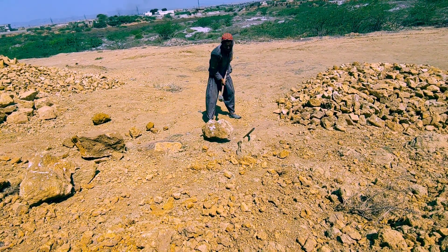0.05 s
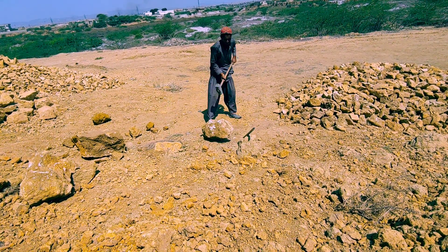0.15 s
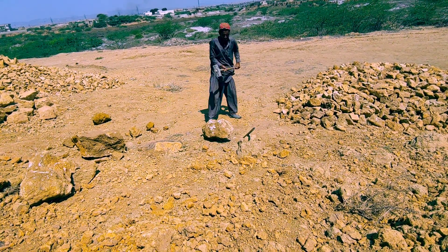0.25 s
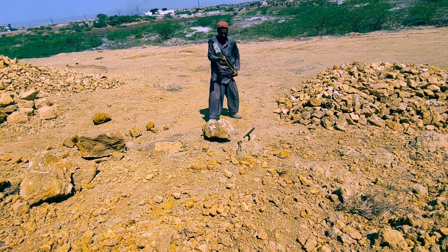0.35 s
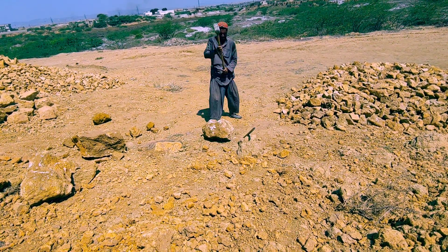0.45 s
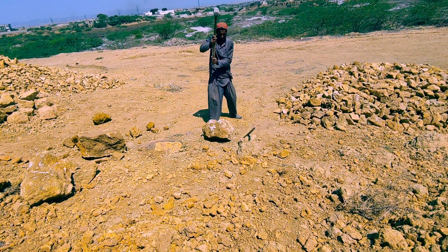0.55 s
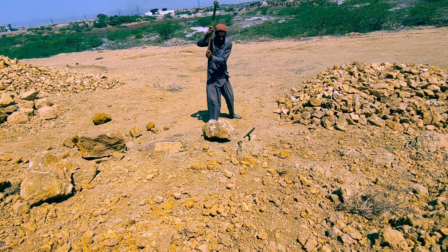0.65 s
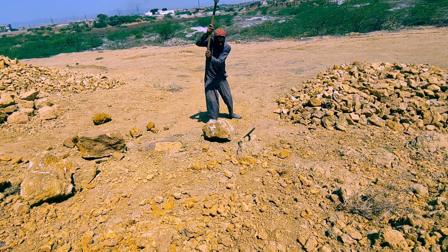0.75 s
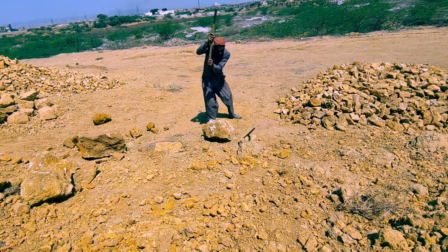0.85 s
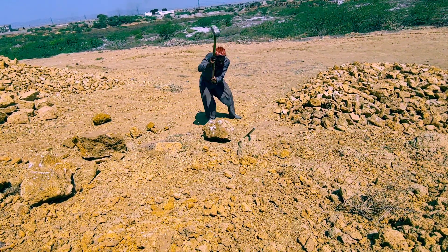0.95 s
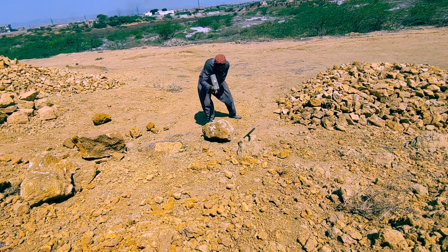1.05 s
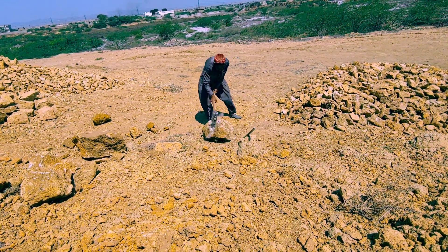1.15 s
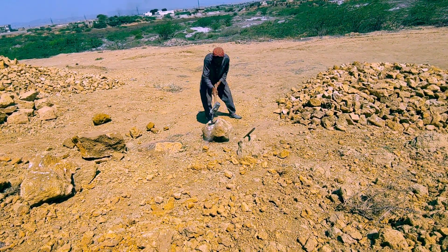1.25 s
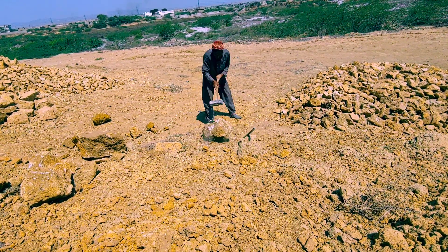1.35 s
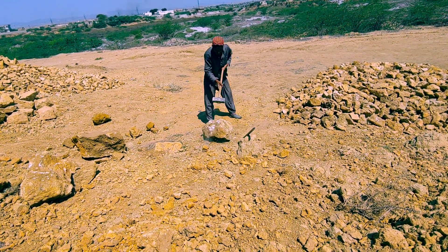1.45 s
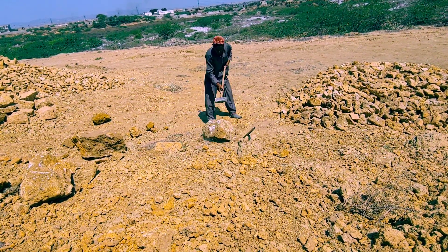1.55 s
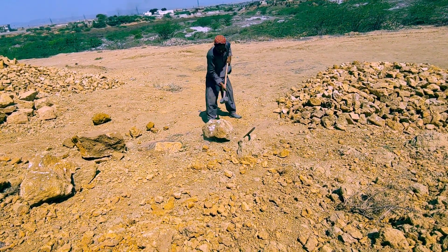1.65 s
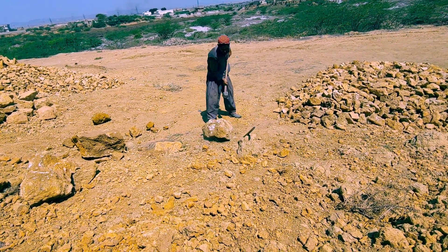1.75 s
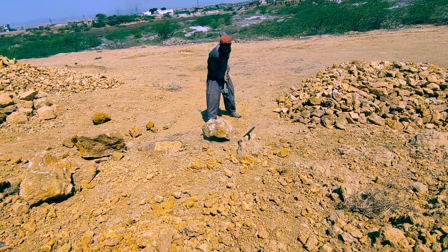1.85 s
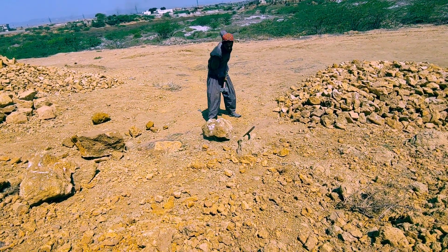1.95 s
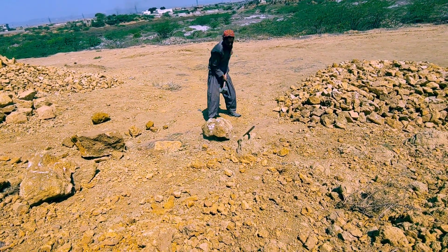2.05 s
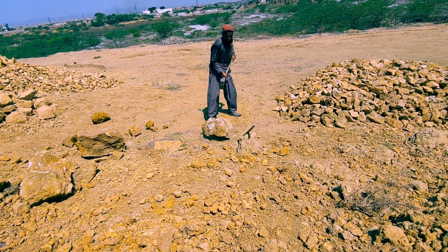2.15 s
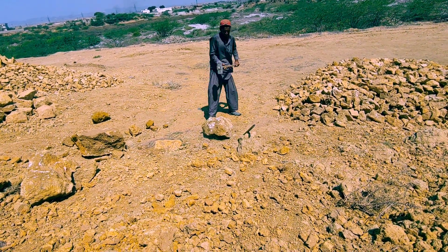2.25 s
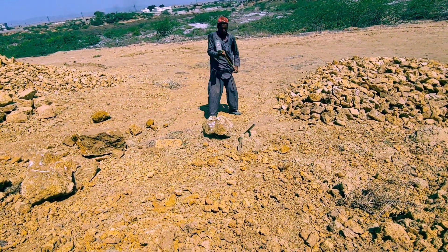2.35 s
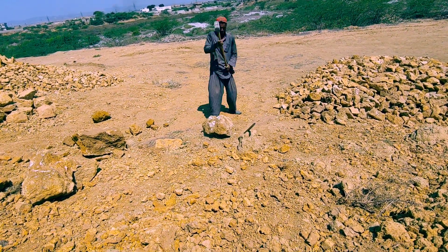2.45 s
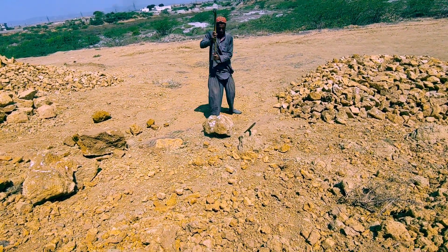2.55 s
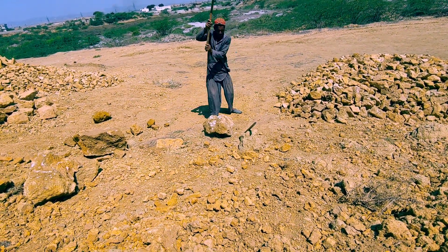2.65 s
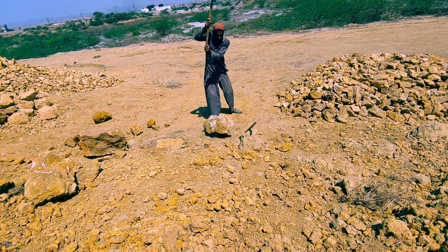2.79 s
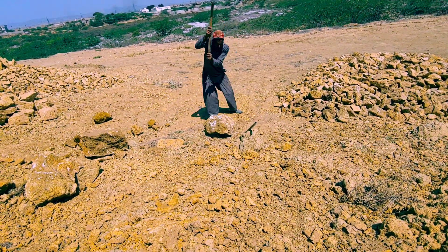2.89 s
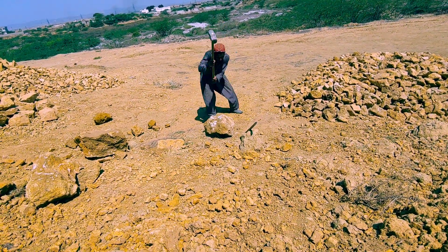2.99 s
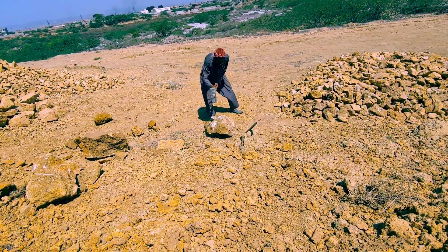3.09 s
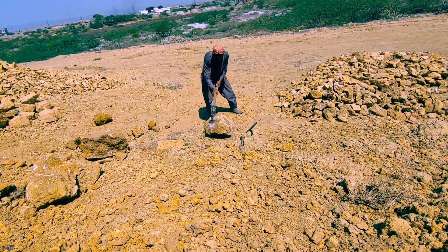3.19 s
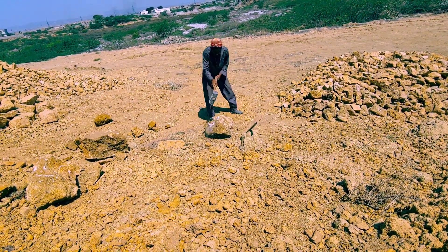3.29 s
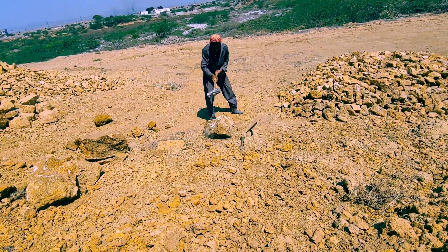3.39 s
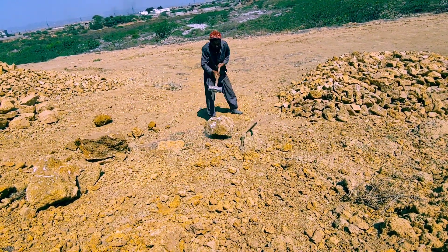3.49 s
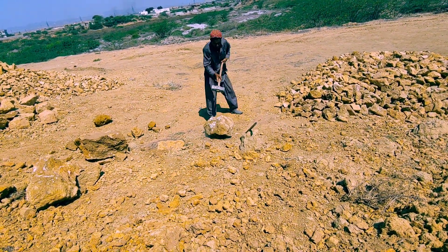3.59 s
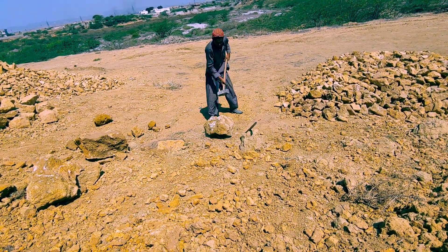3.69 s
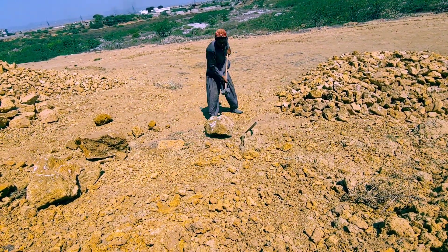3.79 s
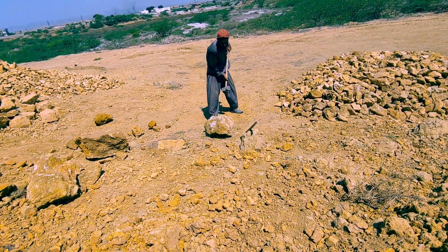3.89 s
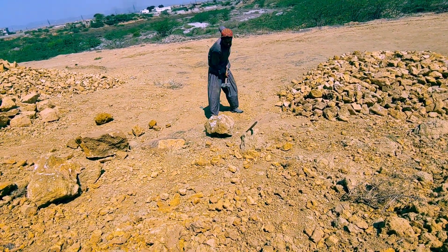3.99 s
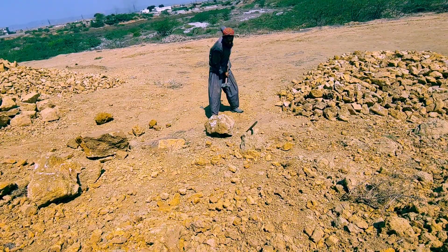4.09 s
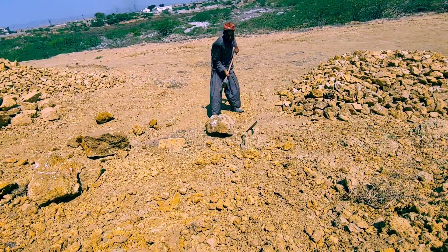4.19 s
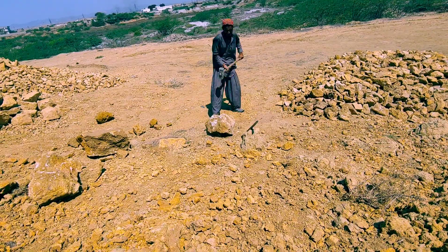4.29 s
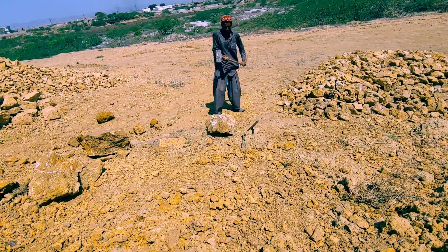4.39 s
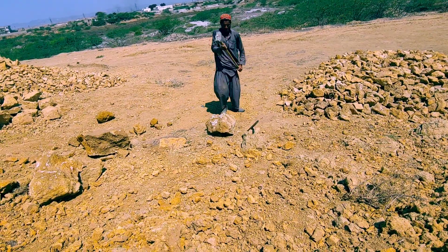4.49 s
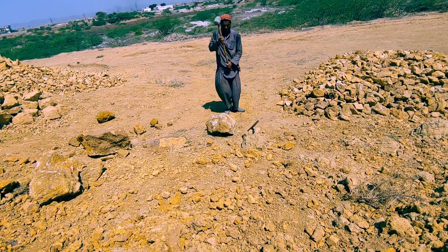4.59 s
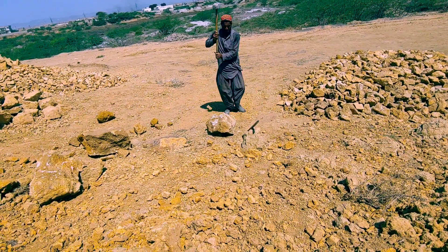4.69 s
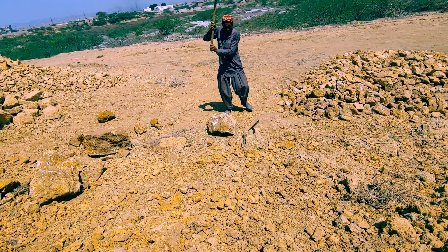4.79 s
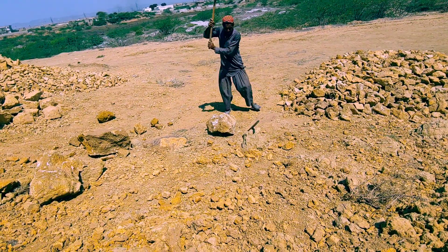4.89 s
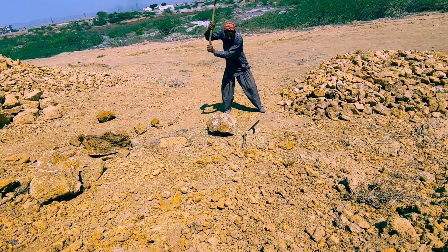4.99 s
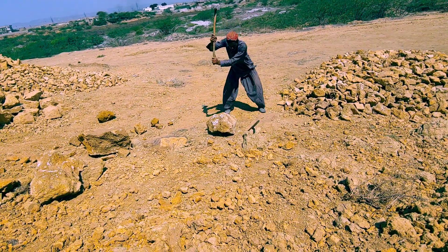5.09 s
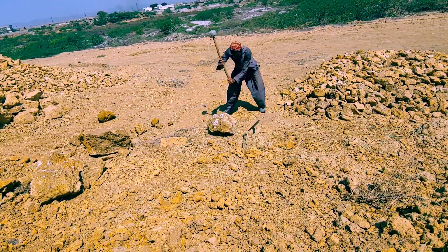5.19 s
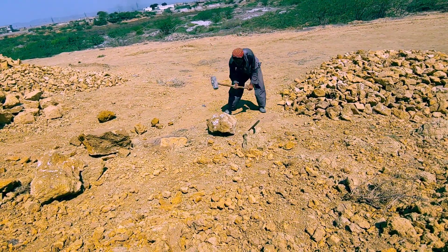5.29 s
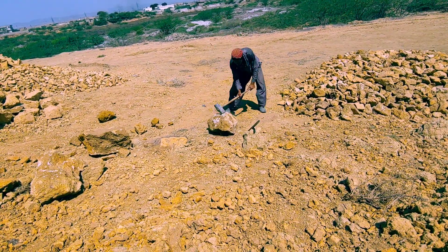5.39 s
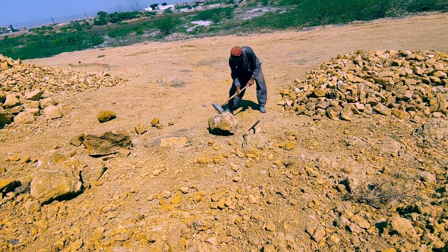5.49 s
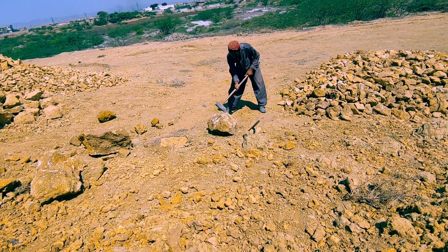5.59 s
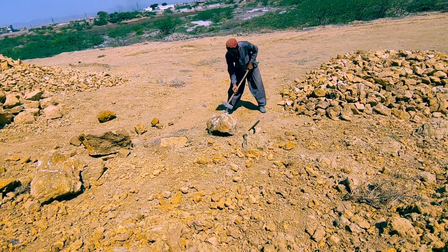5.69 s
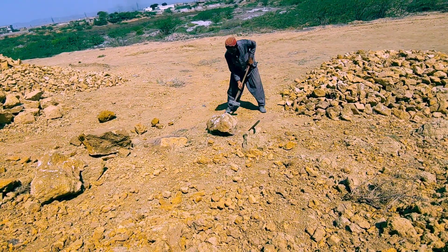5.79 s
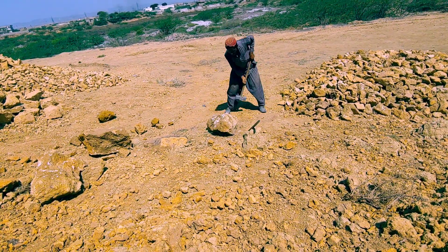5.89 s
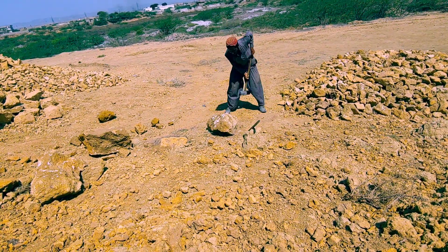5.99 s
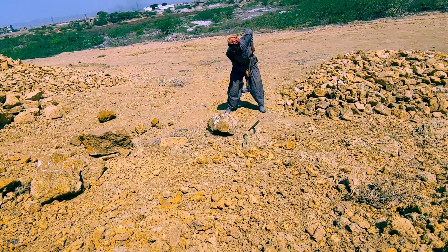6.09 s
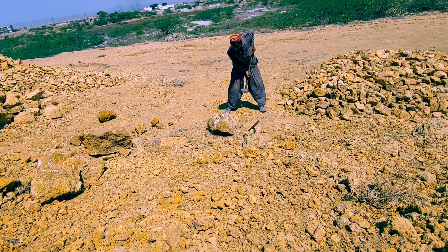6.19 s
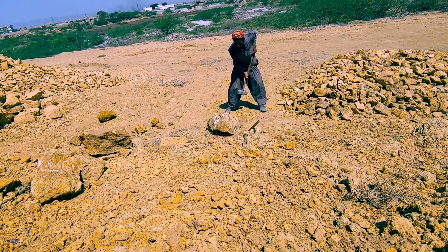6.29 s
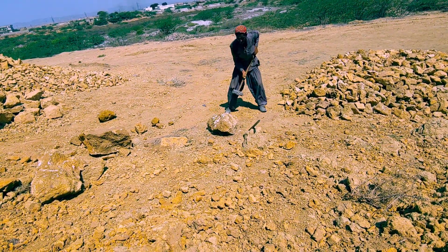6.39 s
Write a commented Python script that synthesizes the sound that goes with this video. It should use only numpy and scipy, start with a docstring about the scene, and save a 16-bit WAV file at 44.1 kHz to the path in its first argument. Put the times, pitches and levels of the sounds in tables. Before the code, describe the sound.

Heavy wind buffets the microphone, then fades, while three sharp, evenly spaced hammer blows strike rock outdoors and small stone fragments clink afterwards.

```python
"""On open, stony ground a sledgehammer strikes a boulder three times: damped tones ring the rock and steel,
phase-scrambled noise makes the cracks, decaying noise and delayed copies make the echoes from the rubble.
Grit scuffs and wooden handle knocks fall between the blows; air swishes and a few low thuds join them.
Wind buffets the microphone, mostly its left port, as bursts of low noise that die away.
Far off, a faint wavering tone sounds once, with a second tone over it, and birds whistle thinly."""
import sys
import numpy as np
from scipy import signal
from scipy.fft import rfft, irfft, next_fast_len
from scipy.io import wavfile
from scipy.ndimage import map_coordinates

SR = 44100
rng = np.random.default_rng(int(sys.argv[2]) if len(sys.argv) > 2 else 0)


def to_wav(sig):
    """Store sig (one row per channel, or 1-D mono) as 16-bit WAV at the path in sys.argv[1].

    Samples outside -1..1 are clipped; the rate is SR.
    """
    pcm = np.clip(np.atleast_2d(sig), -1, 1) * 32767
    pcm = np.round(pcm).astype(np.int16)
    wavfile.write(sys.argv[1], SR, pcm.T)  # frames by channels


N = 284445

# modes of the struck boulder, before each blow shifts them: [f/Hz, relative level/dB, time to fall 60 dB/s]
ROCK_MODES = [(219, -10, 0.035), (356, -16.5, 0.026), (553, -15.5, 0.058), (667, -12.5, 0.03),
              (857, -4, 0.015), (1230, -5, 0.024), (1430, -8.5, 0.033), (1760, -20, 0.022),
              (1924, -11.5, .016), (2370, -22, 0.0086), (2834, -15.5, 0.012), (3250, -24.5, 0.012),
              (3600, -25, 0.012), (4500, -33.5, 0.015)]
CRACK_DB = 6.5  # added to the level of every crack


def amp(db):
    """Turn decibels into a plain multiplier."""
    return 10 ** (np.asarray(db) / 20)


def unit(x):
    """Scale a sound to an rms of 1."""
    return x / np.sqrt(np.mean(x ** 2) + 1e-20)


def curves(rows):
    """One value per sample for each column after the time."""
    s, *cols = np.transpose(rows)
    return [np.interp(np.arange(N) / SR, s, c) for c in cols]


def wobble(rate, size=N):
    """A smooth random curve, rate knots a second."""
    knots = rng.standard_normal(int(size * rate / SR) + 4)
    return map_coordinates(knots, [np.arange(size) * rate / SR])


def filtered(x, response):
    """Shape the spectrum of x by a response that depends on frequency."""
    n = x.shape[-1]
    padded = next_fast_len(n + SR // 8)
    spectrum = rfft(x, padded) * response(np.fft.rfftfreq(padded, 1 / SR))
    return irfft(spectrum, padded)[..., :n]


def noise(spectrum, size):
    """Noise of rms 1 with a [f/Hz, level/dB] spectrum."""
    f, db = np.transpose(spectrum)
    white = rng.standard_normal(size)
    return unit(filtered(white, lambda hz: amp(np.interp(np.log(hz + 1), np.log(f), db))))


def wide(spectrum, size, side_db):
    """Stereo noise: a shared part and a difference between the ports."""
    mid = noise(spectrum, size)
    side = amp(side_db) * noise(spectrum, size)
    return unit(np.array([mid + side, mid - side]))


def burst(t, length, edge):
    """A soft-edged window that lasts for length."""
    rise = np.sin(np.pi / 2 * np.clip(t / edge, 0, 1)) ** 2
    return rise / (1 + (t / length) ** 14)


def add(track, s, sound):
    """Mix a sound into a track at time s."""
    part = track[..., max(0, round(s * SR)):][..., :sound.shape[-1]]
    part += sound[..., :part.shape[-1]]


def ring(modes, t):
    """Damped modes, one row each; neighbours swing in opposite directions."""
    rows = []
    for k, (hz, db, t60) in enumerate(modes):
        rows.append((-1) ** k * amp(db - 60 * t / t60) * np.sin(2 * np.pi * hz * t))
    return np.array(rows)


def air(rush_db, hiss_db):
    """Moving air: a broad rush of noise with a slightly grainy hiss above it."""
    # spectra of the rush and of the hiss: [f/Hz, relative level/dB]
    rush_spectrum = [(60, -8), (200, 8), (500, 3.5), (800, 4.5), (1050, -4.5), (1350, 1), (1650, -8.5),
                     (2000, -8.5), (3000, -23.5), (6000, -45.5)]
    hiss_spectrum = [(1000, -17.5), (2600, 3), (4500, -1.5), (6500, -9), (8500, -15.5), (11500, -12),
                     (13500, -23)]
    gusts_db = .6 * wobble(10)
    rush = amp(rush_db - 2.0 + gusts_db) * wide(rush_spectrum, N, side_db=-4.0)
    grainy_db = hiss_db + gusts_db + 0.38 * wobble(230)
    return rush + amp(grainy_db) * wide(hiss_spectrum, N, side_db=0.0)


def breeze():
    """Air rushes over the open ground; the hiss follows its level."""
    # strength of the breeze, before the gusts and trim in air(): [t/s, level/dB]
    strength = [(0, -54), (.5, -55), (1.08, -53), (1.32, -59.5), (1.6, -55.5), (2.77, -54.5), (2.82, -65),
                (6.45, -64)]
    strength_db, = curves(strength)
    return air(strength_db, strength_db - 18.5)


def soughs():
    """The first gusts carry a thin, high band of rushing air."""
    # swells: [t/s, length/s, level/dB]
    swells = [(.1, .23, -58.5), (.92, .19, -65)]
    # colour of the air: [f/Hz, relative level/dB]
    sough_spectrum = [(900, -25.5), (1400, 9), (2000, 3), (2300, -14), (4000, -37.5)]
    out, t = np.zeros((2, N)), np.arange(SR // 2) / SR
    for s, length, db in swells:
        add(out, s, amp(db) * burst(t, length, edge=.06) * wide(sough_spectrum, len(t), side_db=-4))
    return out


def winds():
    """Strength of the wind at each port, in dB."""
    # wind at the left and at the right port: [t/s, strength/dB]
    left_wind = [(0, -1), (.16, -18.5), (.22, -22.5), (.4, -9), (.53, -20), (.64, -19), (.79, -27),
                 (.9, -31), (1.05, -21.5), (1.12, -32), (1.2, -30.5), (1.3, -20.5), (1.35, -38),
                 (1.5, -15.5), (1.6, -34), (2.25, -32.5), (2.4, -42.5), (2.55, -45), (2.8, -48),
                 (3.03, -57.5), (3.42, -52.5), (3.56, -38), (3.7, -50.5), (3.85, -31.5), (4.03, -39),
                 (4.12, -53), (4.7, -54), (6.45, -59)]
    right_wind = [(0, -9), (.2, -29), (.29, -23.5), (.33, -22), (.43, -32.5), (.66, -25.5), (.82, -26.5),
                  (.95, -42.5), (1.38, -45), (1.62, -28.5), (1.92, -33), (2.25, -28), (2.42, -44.5),
                  (2.77, -38.5), (2.92, -54), (3.68, -57.5), (3.78, -41), (3.92, -34), (4.02, -56),
                  (6.45, -56)]
    return curves(left_wind) + curves(right_wind)


def eddy(length, db):
    """A swirl of air: a low push that levels off, and a flutter that is brighter when stronger."""
    # spectra of the push and of the flutter: [f/Hz, relative level/dB]
    push_spectrum = [(15, -18.5), (45, -3.5), (90, 8.5), (200, 2), (290, -6), (420, -24.5), (900, -92)]
    flutter_spectrum = [(120, -34), (300, 8), (450, 6.5), (700, -9.5), (1200, -28.5), (2000, -43.5),
                        (3500, -63.5), (6000, -105)]
    t = np.arange(SR // 10) / SR
    push = noise(push_spectrum, len(t)) * burst(t, length, edge=.003)
    age = t / (.4 * length)  # 1 when the flutter's average swell is strongest
    flutter = noise(flutter_spectrum, len(t)) * (age * np.exp(-age)) ** 3
    flutter = flutter * amp(4.5 * wobble(120, size=len(t)))
    flutter_db = -21.5 + 1.09 * db  # grows a little faster than the strength
    reach_hz = 2180 * amp(flutter_db / 4)
    flutter = filtered(flutter, lambda hz: 1 / np.hypot(1, (hz / reach_hz) ** 2))
    overload_db = -9  # the push gain levels off here
    push_gain = amp(db) / (1 + amp(db - overload_db) ** 4) ** (1 / 4)
    return (push_gain * unit(push) + amp(flutter_db) * unit(flutter)) * np.sqrt(length / t[-1])


def buffeting():
    """Turbulence rumbles in each port separately; hard eddies thump through it."""
    # colour of the rumble: [f/Hz, relative level/dB]
    rumble_spectrum = [(15, -17.5), (40, 7.5), (85, 4.5), (140, -1.5), (220, -13.5), (320, -27.5),
                       (600, -43.5), (1500, -60.5), (3000, -100)]
    # the hardest eddies: [t/s, length/s, strength/dB, port (0 left, 1 right)]
    hard_eddies = [(.004, 0.034, 7, 0), (0.043, 0.06, -25, 1), (0.047, 0.024, -4, 0),
                   (0.071, 0.021, 7.5, 0), (0.096, 0.019, 7, 0), (0.128, 0.048, 4, 0), (0.202, 0.012, 0, 0),
                   (0.272, 0.037, 2, 0), (0.318, 0.016, -7.5, 0), (0.369, 0.022, -3.5, 0),
                   (0.443, 0.058, -9, 0), (0.536, 0.13, -24, 1), (0.557, 0.035, -8.5, 0),
                   (0.583, 0.033, 1.5, 0), (0.609, 0.039, 4, 0), (0.613, 0.017, -18.5, 1),
                   (0.67, 0.042, -20.5, 0), (0.738, 0.016, -11.5, 0), (0.828, 0.016, -18.5, 0),
                   (0.942, 0.022, -18.5, 0), (0.991, 0.021, -21.5, 0), (1.02, 0.019, -10.5, 0),
                   (1.388, 0.015, -17.5, 0), (1.438, 0.0067, -10.5, 0), (1.524, 0.034, -11, 0),
                   (1.858, 0.012, -31, 0), (2.17, 0.016, -27, 0), (2.259, .03, -20.5, 1),
                   (2.322, .02, -47, 1), (2.921, 0.014, -49, 0), (3.48, 0.026, -44.5, 0),
                   (3.598, 0.025, -31, 0), (3.811, 0.022, -30.5, 0), (3.894, 0.025, -38.5, 1)]
    out = np.array([amp(db) * unit(noise(rumble_spectrum, N) * amp(5.1 * wobble(14))) for db in winds()])
    for s, length, db, port in hard_eddies:
        add(out[int(port > .5)], s, eddy(length, db))
    return out


def small_eddies():
    """Lesser eddies reach each port at random, their strength following the wind there."""
    out = np.zeros((2, N))
    rate, length = 5.7, 0.023  # eddies per second; seconds
    below_wind_db, spread_db = -6, 3
    for port, wind_db in zip(out, winds()):
        for slot in range(int(rate * N / SR)):
            s = (slot + rng.random()) / rate
            db = wind_db[int(s * SR)] + below_wind_db + spread_db * rng.standard_normal()
            add(port, s, eddy(length, db))
    return out


def crackles():
    """A breaking eddy snaps the pressure at the left port down and up once."""
    # snaps, before the port softens them: [t/s, peak level/dB, f/Hz]
    snaps = [(.003, -9, 480), (.022, -10, 430), (.029, -7, 400), (.081, -9, 540), (.086, -13, 620),
             (.103, -13, 430), (.108, -9, 480), (.131, -14, 400), (.139, -10, 400), (.152, -17, 520),
             (.162, -6, 500), (.208, -16, 420), (.215, -15, 420), (.281, -16, 420), (.291, -16, 430),
             (.3415, -4, 600), (.384, -15, 350), (.461, -19, 380), (.563, -23, 400), (.59, -11, 660),
             (.621, -12, 470), (.635, -13, 580), (.746, -23, 370), (.843, -25, 400), (.953, -28, 360),
             (1.034, -25, 320), (1.441, -22, 350), (1.534, -21, 320)]
    out, t = np.zeros((2, N)), np.arange(SR // 100) / SR - 1 / 200
    for s, db, hz in snaps:
        u = 2 * np.pi * hz * t
        add(out[0], s + t[0], amp(db) * u * np.exp((1 - u ** 2) / 2))
    return out


def ports(pressure):
    """Wind pressure saturates in the ports, which pass little of its treble."""
    held = pressure / (1 + np.abs(pressure / .95) ** 4) ** (1 / 4)
    return filtered(held, lambda hz: 1 / np.hypot(1, (hz / 1850) ** 4))


def far_tone():
    """Two faint tones from across the field, wavering in pitch and level; the second rises."""
    # the first tone, then the second, before wavering: [t/s, f/Hz, level/dB]
    first_tone = [(3.32, 513, -94), (3.37, 515, -67), (3.41, 508, -66), (3.46, 490.5, -78.5),
                  (3.52, 503, -62.5), (3.57, 509, -63), (3.61, 508, -66), (3.635, 510, -53),
                  (3.665, 525, -79)]
    second_tone = [(3.551, 590, -100), (3.585, 596, -61), (3.615, 600, -55), (3.65, 622, -100)]
    out = np.zeros(N)
    for rows in (first_tone, second_tone):
        hz, db = curves(rows)
        level = amp(db + 5.9 * wobble(17))
        phase = 2 * np.pi * np.cumsum(hz + 5 * wobble(48)) / SR
        out += level * np.sin(phase)
    return out


def birds():
    """Far birds give short, thin whistles: sine tones with a slightly unsteady pitch."""
    # whistles: [t/s, average f/Hz, level/dB, length/s]
    whistles = [(4.0, 2557, -83, .13), (5.06, 2622, -80, .16), (6.13, 2287, -84, .15)]
    out, t = np.zeros(N), np.arange(SR // 4) / SR
    for s, hz, db, length in whistles:
        phase = 2 * np.pi * np.cumsum(hz + 10 * wobble(75)[:len(t)]) / SR
        add(out, s, amp(db) * burst(t, length, edge=0.09) * np.sin(phase))
    return out


def thuds():
    """Dull thuds: one low, damped tone at each port, a little higher on the left."""
    # low thuds: [t/s, left level/dB, right level/dB, time to fall 60 dB/s]
    low_thuds = [(4.624, -36, -28.5, 0.23), (5.336, -13, -15, 0.088)]
    out, t = np.zeros((2, N)), np.arange(SR // 4) / SR
    for s, left_db, right_db, t60 in low_thuds:
        left, right = ring([(72.0, left_db, t60), (57.0, right_db, t60)], t)
        add(out, s, np.array([left, right]) * (1 - np.exp(-t / 0.0003)))
    return out


def grind(t, db, length, treble_db):
    """One short grainy burst of grit, with its echo from the ground."""
    # colour of the grit, before the treble tilt: [f/Hz, relative level/dB]
    grit_spectrum = [(200, -7.5), (600, -6.5), (870, 5.5), (1100, -6), (1430, 3), (1650, -16.5),
                     (1950, 2.5), (2350, -16), (2900, -8), (5000, -21), (7000, -17), (9000, -32.5),
                     (11500, -24), (13000, -32.5)]
    grains = wide(grit_spectrum, len(t), side_db=-1.5) * amp(2.3 * wobble(570)[:len(t)])
    grains = unit(filtered(grains, lambda hz: amp(treble_db * hz ** 4 / (hz ** 4 + 3500 ** 4))))
    echo = amp(-15 - 60 * t / .18)
    return amp(db) * grains * (burst(t, length, edge=length / 5) + echo)


def scuffs():
    """Feet and hammer scuff the grit between the blows."""
    # small scuffs: [t/s, level/dB, length/s, treble/dB]
    small_scuffs = [(0.034, -51.5, 0.0051, 7), (0.15, -59, 0.0034, 8), (0.331, -50, 0.0036, -2),
                    (0.833, -61, 0.0067, -0.5), (0.862, -62, 0.0024, -4.5), (1.263, -58.5, 0.0033, 6.5),
                    (1.757, -55, 0.0088, 6), (2.34, -56.5, 0.037, -14), (3.472, -69, 0.011, -2),
                    (3.924, -54, 0.004, -4), (4.556, -51.5, 0.03, -23), (4.619, -60.5, 0.014, -15),
                    (4.968, -56.5, 0.02, -11.5), (4.996, -65.5, 0.011, -6.5), (5.334, -40, 0.002, -17),
                    (5.94, -74, 0.0045, 18.5), (6.308, -69.5, 0.011, 10.5), (6.394, -68, 0.0095, -3)]
    out, t = np.zeros((2, N)), np.arange(SR // 5) / SR
    for s, db, length, treble_db in small_scuffs:
        add(out, s, grind(t, db, length, treble_db))
    return out


def grips():
    """The wooden handle gives a small knock when the hands slide and close on it."""
    # shifts of the grip: [t/s, level/dB]
    shifts = [(4.561, -54.5), (4.576, -56.5), (4.971, -66.5)]
    # the handle's modes, before extra damping: [f/Hz, relative level/dB, time to fall 60 dB/s]
    handle_modes = [(823, -12.5, 0.22), (1020, -15.5, 0.15), (1415, 4.5, 0.087), (1976, -9, 0.085),
                    (2541, -25, 0.1), (2856, -25.5, 0.072)]
    out, t = np.zeros(N), np.arange(SR // 5) / SR
    for s, db in shifts:
        weights = amp(db + rng.normal(0, 1.8, len(handle_modes)))
        add(out, s, weights @ ring(handle_modes, t) * np.exp(-t / 0.061))
    return out


def swishes():
    """A soft swish of air rises, holds and fades as the hammer is drawn back."""
    # swishes, before the gusts and trim in air(): [t/s, hold/s, rush level/dB, hiss level/dB]
    draws = [(1.419, 0.047, -51, -61.5), (3.718, 0.14, -54.5, -70.5)]
    attack_s, fall_db_per_s = 0.035, 86.5
    out = np.zeros((2, N))
    for s, hold, rush_db, hiss_db in draws:
        t = np.arange(N) / SR - s
        fade_db = fall_db_per_s * np.maximum(t - attack_s - hold, 0)
        out += np.clip(t / attack_s, 0, 1) * amp(-fade_db) * air(rush_db, hiss_db)
    return out


def fragments():
    """After the last blow, stone fragments skid in the grit and clink against loose stones."""
    # landings: [t/s, grinding level/dB, clink level/dB]
    landings = [(5.612, -82, -64), (5.632, -72, -65), (5.731, -58, -54), (5.749, -58, -52),
                (5.775, -70, -61), (5.81, -75, -65), (5.833, -74, -55)]
    # loose stones, before each is detuned: [f/Hz, relative level/dB, time to fall 60 dB/s]
    stone_modes = [(1334, -7, 0.08), (2830, -9, 0.1), (4596, -15, .055), (6770, -14, .035)]
    out, t = np.zeros((2, N)), np.arange(SR // 5) / SR
    for s, db, clink_db in landings:
        weights = amp(clink_db + rng.normal(0, 1.8, len(stone_modes)))
        # no two stones ring at quite the same pitch
        clink = weights @ ring(stone_modes, t * (1 + 0.015 * rng.standard_normal()))
        rattle = 1 + .5 * wobble(250, len(t))
        skid = grind(t, db, length=0.018, treble_db=10)
        add(out, s, skid + clink * rattle)
    return out


def fracture(size):
    """A few milliseconds of tiny splits in the stone, with the spectrum of chipping."""
    # colour of chipping stone: [f/Hz, relative level/dB]
    chip_spectrum = [(300, -22.5), (1500, 7), (2400, 7), (3200, 2.5), (4400, 1), (5300, -8), (6400, -6),
                     (7800, -15), (10500, -12), (11800, -16.5), (13000, -35)]
    u = np.arange(size) / SR / .0008  # time, counted in steps of 0.8 ms
    tiny = rfft(rng.standard_normal((2, size)) * u * np.exp(-u))
    tiny = np.array([tiny[0] + .7 * tiny[1], tiny[0] - .7 * tiny[1]])
    f, db = np.transpose(chip_spectrum)
    gain = amp(np.interp(np.log(np.fft.rfftfreq(size, 1 / SR) + 1), np.log(f), db))
    # keep only the phases of the noise and impose the chipping spectrum
    coloured = irfft(gain * tiny / np.abs(tiny), size)
    return unit(coloured * (u < 20)) / np.sqrt(size)


def splits():
    """The stone gives way in steps: each split cracks and rings the boulder's upper modes again."""
    # chips that split off just after a crack: [t/s, crack level before CRACK_DB/dB, knock level/dB]
    chip_splits = [(1.1448, -8, -13), (1.1505, -18, -23), (1.1638, -16, -22), (3.1798, -6, -8),
                   (3.1822, -19, -12), (3.1862, -17, -19), (3.1995, -27, -25), (5.3822, -24, -11),
                   (5.4585, -52, -40)]
    out, t = np.zeros((2, N)), np.arange(SR // 10) / SR
    upper = [mode for mode in ROCK_MODES if mode[0] > 1600]
    for s, db, knock_db in chip_splits:
        knock = amp(knock_db + rng.normal(0, 0.93, len(upper))) @ ring(upper, t)
        add(out, s, amp(db + CRACK_DB) * fracture(len(t)) + knock)
    return out


def stone_echoes(knock):
    """The nearest stones throw back the knock at uneven delays, without its bass."""
    count = 26
    delay = np.linspace(.011, .05, count) + rng.uniform(-.001, .001, count)
    size = rng.standard_normal(count) * np.exp(-delay / 0.011)
    # together the copies carry -10.5 dB before the bass is cut
    taps = np.bincount((delay * SR).astype(int), amp(-10.5) * size / np.linalg.norm(size))
    echoes = signal.fftconvolve(knock, taps[None], axes=1)[:, :knock.shape[1]]
    return filtered(echoes, lambda hz: hz ** 2 / (hz ** 2 + 1400 ** 2))


def splinters(t):
    """Splinters tick on the ground, each at its own pitch and place, fainter on the whole as time passes."""
    out = np.zeros((2, len(t)))
    count = 50
    for s in np.linspace(.012, .15, count) + rng.uniform(-.003, .003, count):
        pitch, size_db, pan_db = rng.normal(0, [.22, 2.5, 1.5])
        tick_db = -40 + size_db - 260 * s
        tick = ring([(2350 * np.exp(pitch), tick_db, .035)], t)
        add(out, s, amp([[pan_db], [-pan_db]]) * tick)
    return out


def rubble_echoes(t, chip_db, body_db, scatter_db):
    """Countless stones send the crack back as fading noise: near echoes are loud and die quickly,
    far ones are fainter and last longer, with more around 2.7 kHz."""
    # near and far echoes: [f/Hz, relative level/dB]
    near_spectrum = [(59, -36.5), (100, -4), (220, -1), (450, -4), (665, -5), (880, -2), (1200, -14),
                     (1920, -13), (2400, -16.5), (2940, -14.5), (3250, -21.5), (5640, -29), (6120, -23),
                     (9200, -37.5), (10600, -32), (12000, -49.5), (13000, -78.5)]
    far_spectrum = [(100, -4), (500, -2), (900, -3), (1500, -9), (2700, -7.5), (3600, -19), (6000, -26.5),
                    (12000, -42)]
    near = amp(-17.5 - 60 * t / 0.15) * wide(near_spectrum, len(t), side_db=-4.0)
    far = amp(-50.0 - 60 * t / .36) * wide(far_spectrum, len(t), side_db=-2.0)

    def colour(hz):
        """The echoes take on the blow's treble and body."""
        treble_db = 0.24 * chip_db * hz ** 4 / (hz ** 4 + 9000 ** 4)
        return amp(treble_db + body_db * np.exp(-((hz - 800) / 250) ** 2))

    echoes = filtered(near + far, colour)
    build_up = 1 - np.exp(-t / .004)
    return amp(scatter_db + 1.8 * wobble(250)[:len(t)]) * echoes * build_up


def blows():
    """Each blow knocks the boulder, chips it, rings the steel and shakes the soil."""
    # blows; all levels but the first are relative: [t/s, level/dB, body/dB, edge/dB, chipping/dB,
    # scatter/dB, head ring/dB, head ring's time to fall 60 dB/s, thump/dB, steel/dB, top steel mode/dB,
    # lead of the left port/ms, off-centre/dB]
    strikes = [(1.1414, -3, 2, -3, -0.5, 0, -39.5, 0.15, -3, -3, 6, 0.1, -1),
               (3.1767, -3, 2, 0.5, 0.5, -2, -59, 0.14, -1, -4, -0.5, 0.017, -2.5),
               (5.3793, -0.5, -4.5, 5, -25, -3, -53.5, 0.77, 4.5, -5, -26.5, 0.055, -0.5)]
    # short upper modes of the steel head: [f/Hz, relative level/dB, time to fall 60 dB/s]
    steel_modes = [(2268, -43, .17), (2450, -47, .15), (2830, -44, .13), (2930, -43, .15), (3390, -48, .12),
                   (3784, -50, .12), (4380, -53, .14), (6212, -42, .18), (7560, -56, .11),
                   (10340, -44, .11)]
    # the head's longest ring, a close pair of modes: [f/Hz]
    head_pair = [6884, 6877]
    out, t = np.zeros((2, N)), np.arange(SR // 2) / SR
    contact = np.sin(np.pi / 2 * np.clip(t / .0012, 0, 1)) ** 2
    # a square blow feeds the body modes, a glancing one the upper modes
    rock_hz = np.transpose(ROCK_MODES)[0]
    body, edge = (rock_hz > 500) & (rock_hz < 1050), rock_hz > 1600
    thump = (rock_hz > 300) & (rock_hz < 600)
    # the middle modes come in two pairs; the off-centre level tips the balance within each
    twin = (-1.) ** np.arange(len(ROCK_MODES)) * ((rock_hz > 1100) & (rock_hz < 2150))
    top = np.transpose(steel_modes)[0] > 9000
    for (s, db, body_db, edge_db, chip_db, scatter_db, head_db, head_t60,
         thump_db, steel_db, top_db, lead_ms, off_centre_db) in strikes:
        mode_db = off_centre_db * twin + thump_db * thump + body_db * body + edge_db * edge
        weights = amp(mode_db + rng.normal(0, 0.29, len(ROCK_MODES)))
        # each spot on the rock is pitched a little differently
        left = weights @ ring(ROCK_MODES, t * (1 + 0.0048 * rng.standard_normal()))
        right = filtered(left, lambda hz: np.exp(-2j * np.pi * hz * lead_ms / 1000))  # a pure delay
        knock = np.array([left, right])
        crack = amp(chip_db + CRACK_DB) * fracture(len(t))
        # the pair beats, and is damped once the head rests on the soil
        pair = ring([(head_pair[0], head_db, head_t60), (head_pair[1], head_db - 9.5, head_t60)], t).sum(0)
        pair = pair * amp(-170 * np.maximum(t - .25, 0))
        steel_weights = amp(steel_db + top_db * top + rng.normal(0, 0.67, (2, len(steel_modes))))
        steel = steel_weights @ ring(steel_modes, t) + pair
        shudder = np.clip(t / .02, 0, 1) * np.exp(-t / .07) / (1 + (t / .15) ** 8)
        soil = amp(-26.5) * shudder * np.sin(2 * np.pi * 52 * t + 0.62 * wobble(30)[:len(t)])
        scatter = rubble_echoes(t, chip_db, body_db, scatter_db)
        total = knock + stone_echoes(knock) + crack + steel + soil + scatter + splinters(t)
        add(out, s, amp(db) * contact * total)
    return out


def scene():
    """Mix the wind, the far sounds and the hammer work."""
    wind = breeze() + soughs() + ports(buffeting() + small_eddies() + crackles())
    far = far_tone() + birds()
    hammer = thuds() + scuffs() + grips() + swishes() + fragments() + splits() + blows()
    return wind + far + hammer


def record(dry):
    """A 2 ms fade-in, peaks rounded off towards full scale, and a steep treble cut."""
    fade_in = np.clip(np.arange(N) / SR / .002, 0, 1)
    rounded = fade_in * dry / (1 + np.abs(dry) ** 6) ** (1 / 6)
    return filtered(rounded, lambda hz: 1 / np.hypot(1, (hz / 13240) ** 30))


dry = scene()
out = record(dry)
to_wav(out)
```